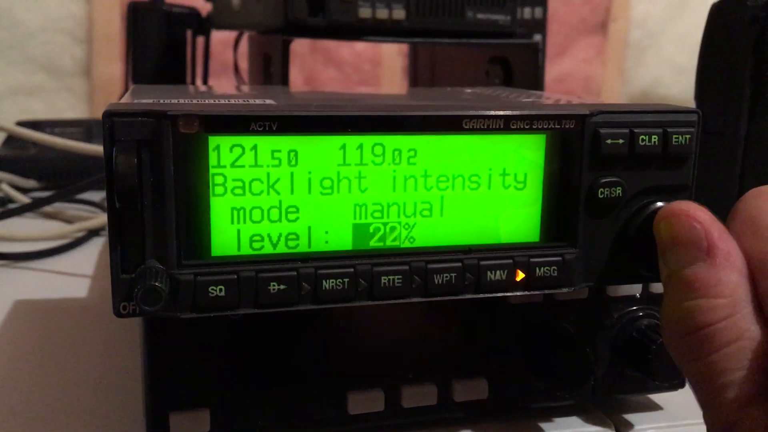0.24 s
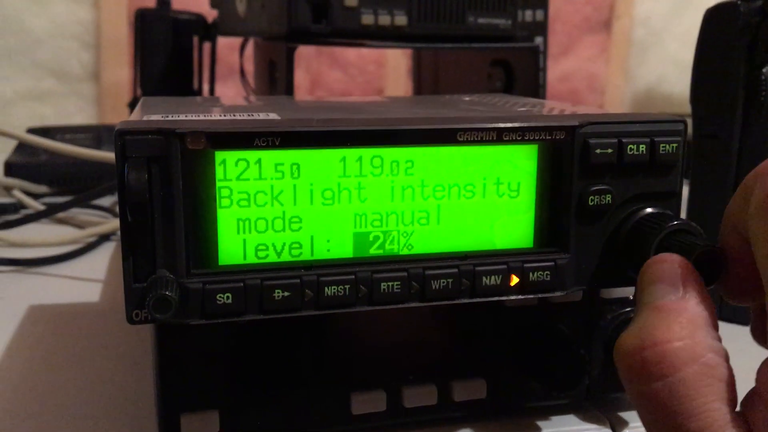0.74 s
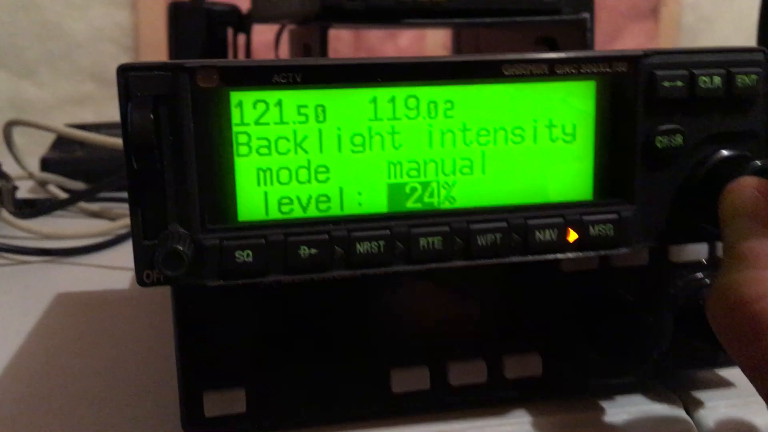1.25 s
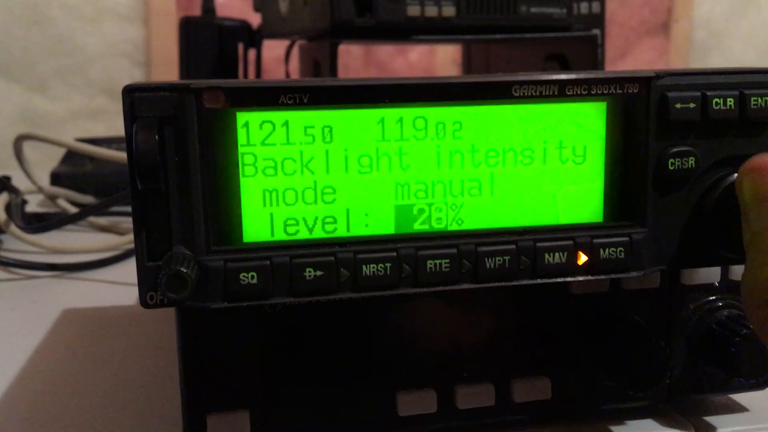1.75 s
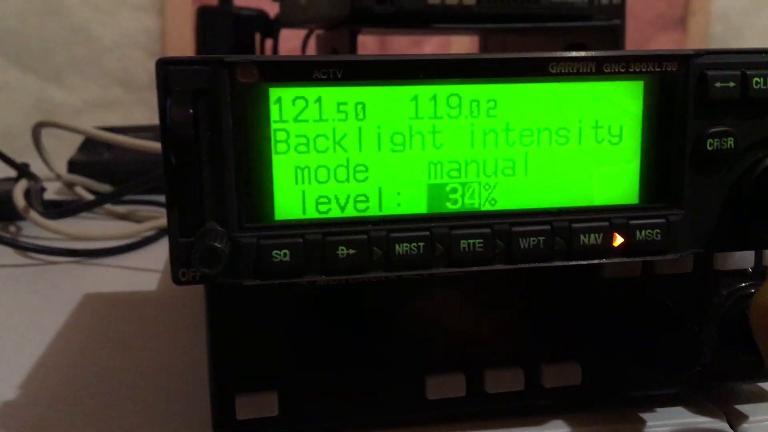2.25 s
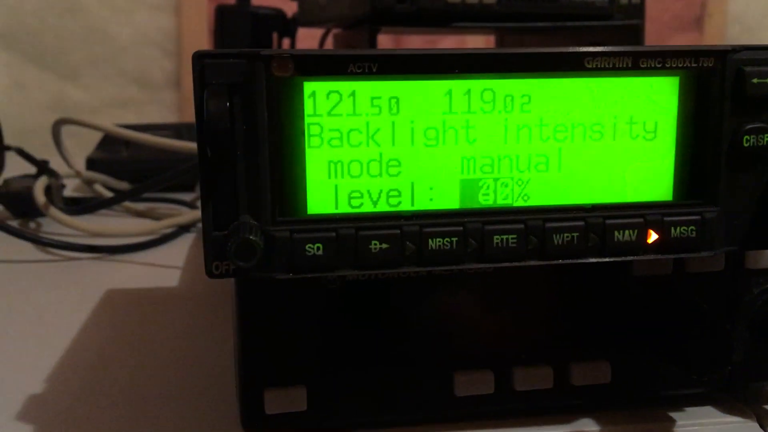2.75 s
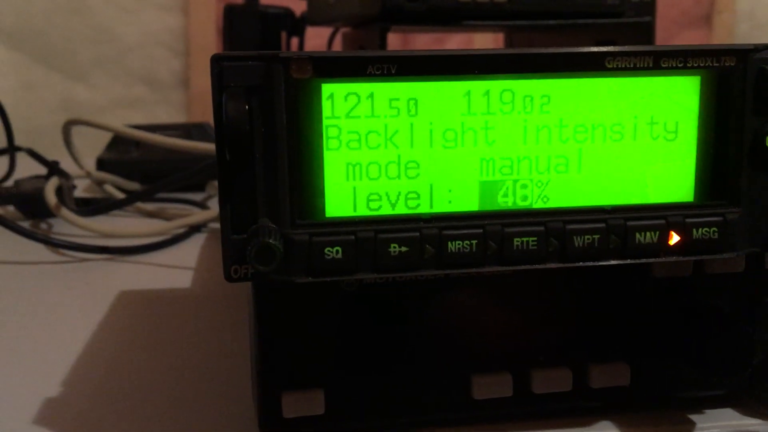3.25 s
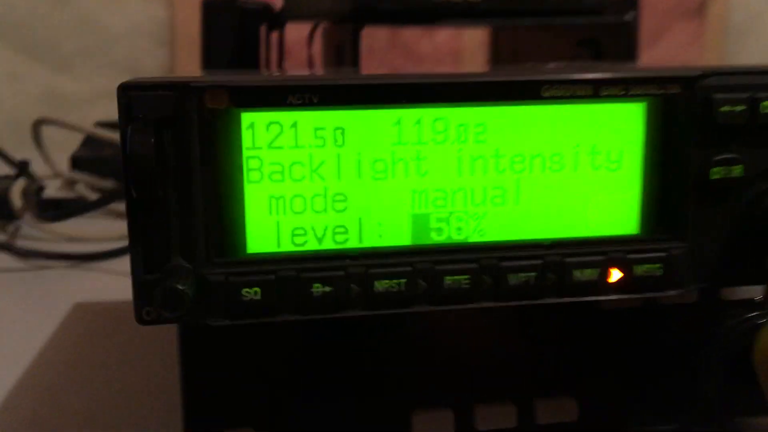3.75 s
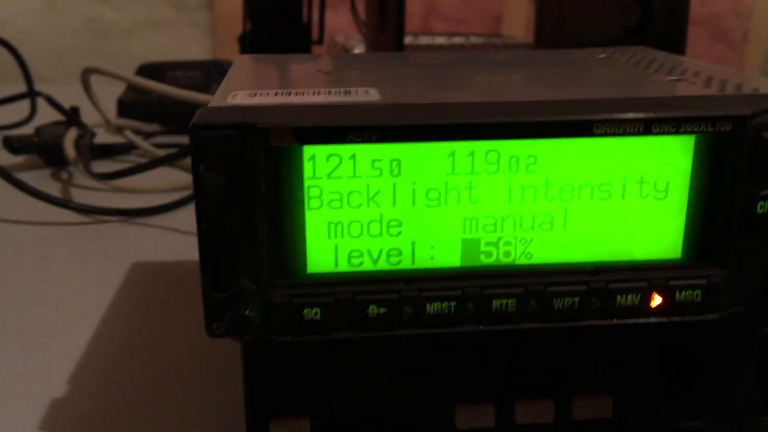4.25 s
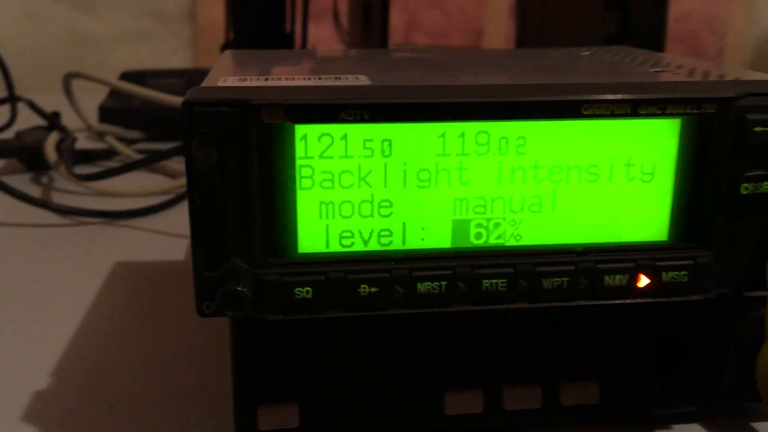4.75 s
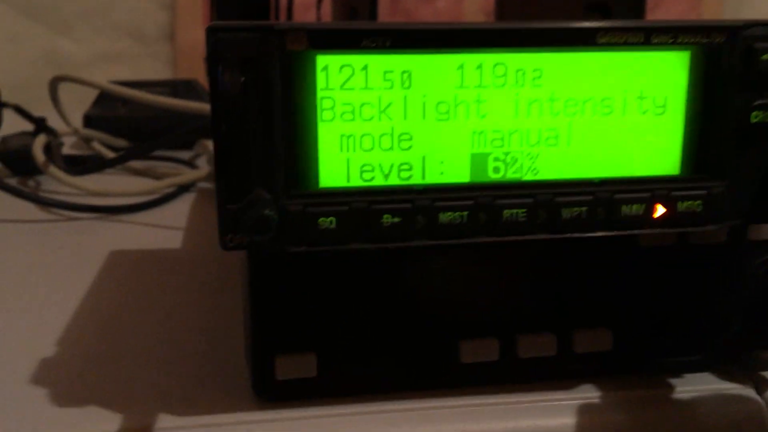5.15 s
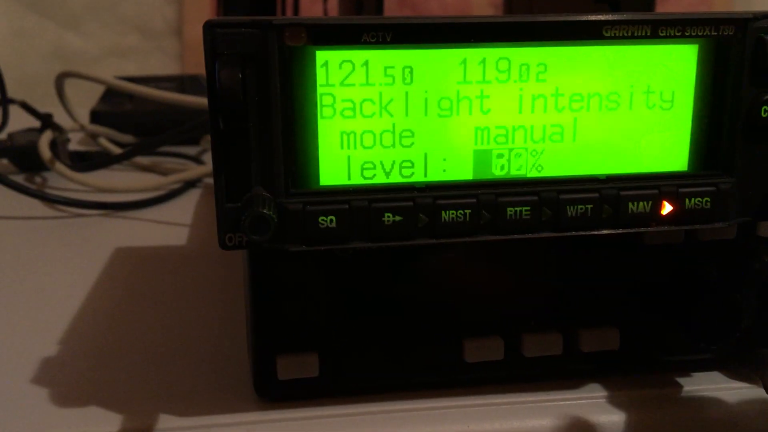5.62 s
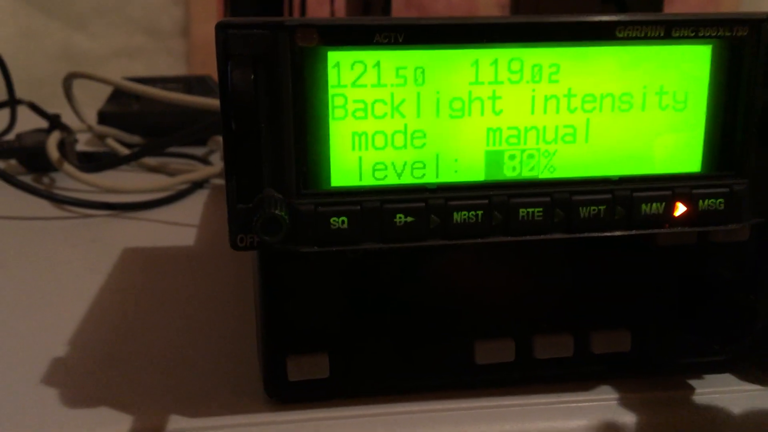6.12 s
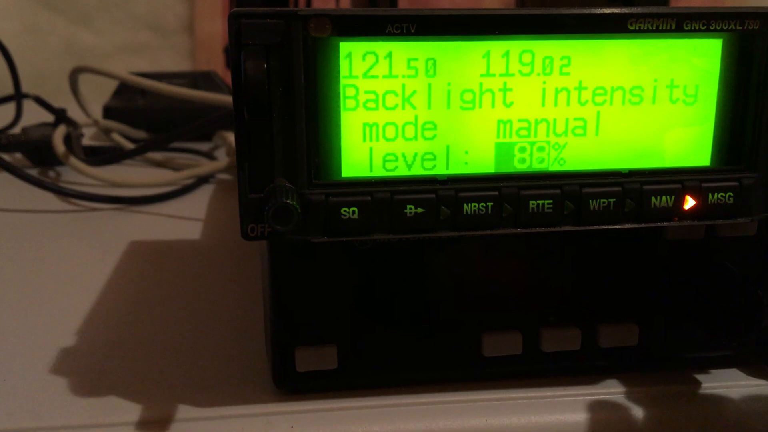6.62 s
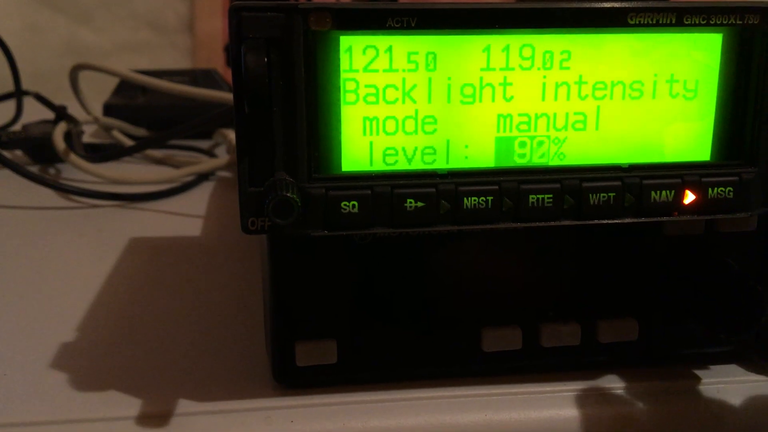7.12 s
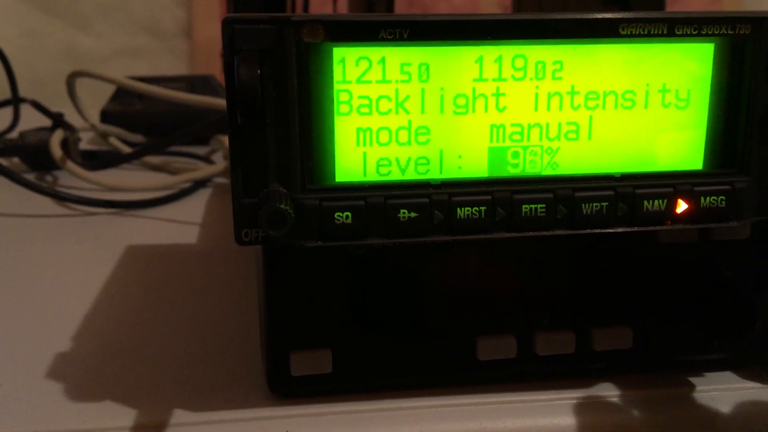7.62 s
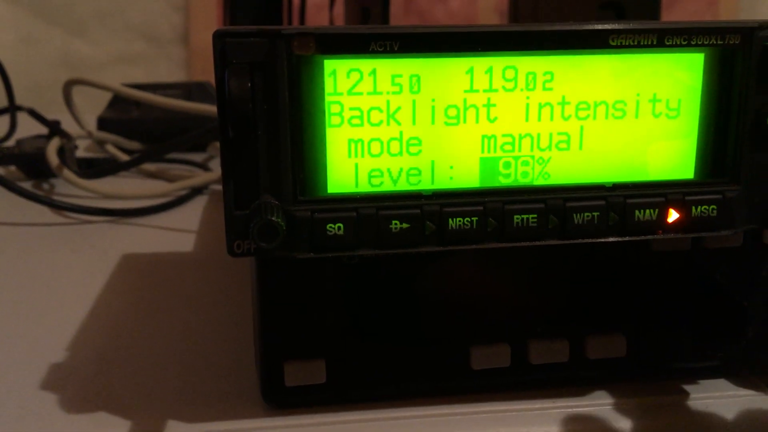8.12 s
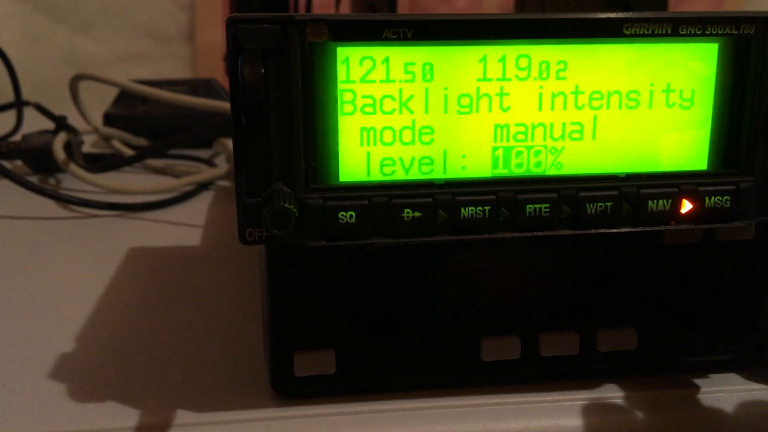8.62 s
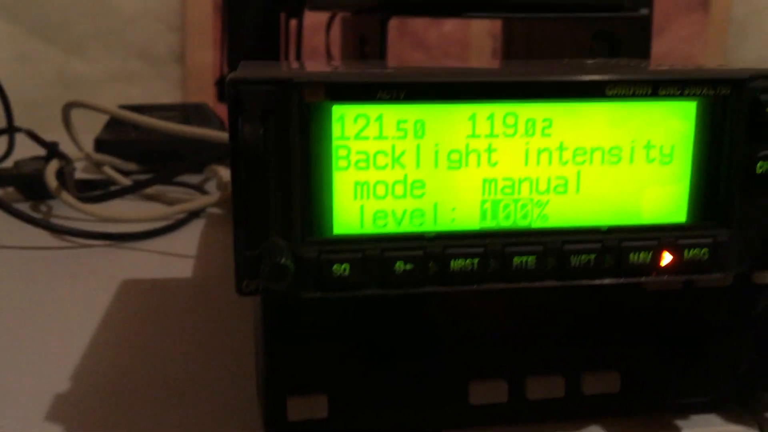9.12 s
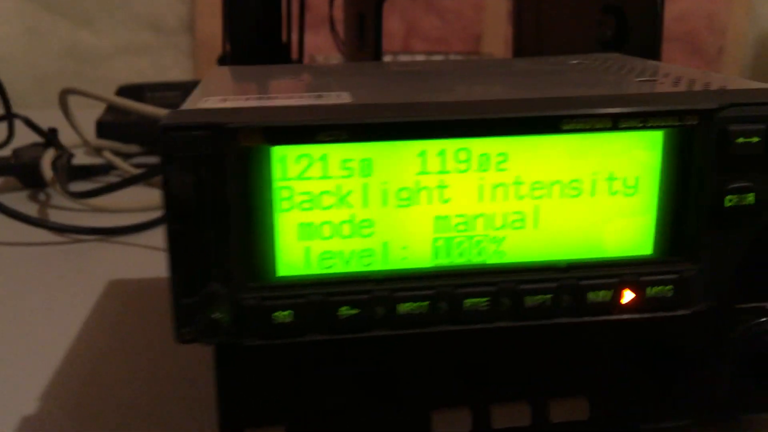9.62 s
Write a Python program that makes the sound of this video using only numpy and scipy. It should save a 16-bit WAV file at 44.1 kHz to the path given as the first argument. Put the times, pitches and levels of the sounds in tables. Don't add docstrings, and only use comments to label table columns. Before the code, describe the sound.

A stiff knob snaps through its notches close by, irregular bursts of bright plasticky clicks above steady cooling-fan drone in a small room.

```python
import sys
import numpy as np
from scipy import signal
from scipy.io import wavfile
from scipy.ndimage import uniform_filter1d

SR = 44100
rng = np.random.default_rng(int(sys.argv[2]) if len(sys.argv) > 2 else 0)


def wav_record(signal):
    frames = np.transpose(np.atleast_2d(signal))
    bounded = np.clip(frames, -1, 1)
    quanta = np.round(bounded * 32767).astype(np.int16)
    wavfile.write(sys.argv[1], SR, quanta)


def amplitude_ratio(level_db):
    exponent = np.asarray(level_db, float) / 20
    return 10 ** exponent


N = 435266

# (frequency [Hz], density [dB/Hz])
AIR = [(20, -27), (40, -13.5), (75, -10.5), (110, -8), (170, -18.5), (260, -8.5), (400, -20), (520, -16.5),
       (800, -16), (2000, -18.5), (2480, -22.5), (2750, -30), (3760, -29.5), (4900, -37.5)]
# (time [s], turn [0-1])
TURNED = [
    (0, 1),
    (.6, .95),
    (1.4, 0.32),
    (2.1, 0),
    (9.25, .05),
    (9.45, .6),
    (9.87, .9),
]
# (frequency [Hz], width [Hz], level [dB rms])
HUM = [(219, 7.1, -80), (320, 5, -87), (505.7, 1.7, -73), (667, 12, -74.5), (791, 3.6, -76), (893, 8, -94),
       (1045, 8.2, -77), (1110, 5.4, -76), (1502, 8, -74.5), (1910, 21, -76.5), (2095, 21, -77),
       (2406, 23, -76)]
# (blade rate [Hz], level [dB rms], octave level [dB rms])
BLADES = [(265.97, -74.7, -95), (268.9, -65.3, -79.7), (271.76, -67.7, -82), (275.02, -68.7, -84)]
SHAFT = [-74.5, -77, -83.5, -71.5, -81, -85]
# (frequency [Hz], level [dB rms])
MAINS = [(120.38, -66), (240, -76)]
# (frequency [Hz], density [dB/Hz])
HISS = [(2500, -16), (5000, -0.5), (6300, -1), (10100, -9.5), (10500, -10.5), (10750, -1), (11300, -7.5),
        (15100, -12), (15750, -15), (15850, -47.5)]
# (time [s], snap [dB], knob tick [dB], case ring [dB],
# panel knock [dB])
DETENTS = [(0.0171, -26, -36.5, -35.5, -39.5), (0.3651, -24.5, -30, -34.5, -39),
           (1.4391, -19.5, -25, -31, -41.5), (1.6002, -18.5, -25.5, -32, -36.5),
           (1.726, -17.5, -28.5, -33.5, -39.5), (1.8436, -19.5, -28, -32.5, -43),
           (1.952, -17.5, -27.5, -33.5, -39), (2.3974, -14.5, -26.5, -30, -34.5),
           (2.4497, -17.5, -26, -30, -37), (2.534, -19, -25.5, -34, -36),
           (2.6202, -20.5, -28.5, -31.5, -42), (2.7321, -22.5, -27.5, -30.5, -37),
           (2.824, -20, -29, -34, -38.5), (3.2023, -13, -22.5, -34, -41),
           (3.2565, -16.5, -26.5, -31.5, -40), (3.3433, -18.5, -24.5, -33.5, -38),
           (3.4045, -17.5, -29, -35.5, -41), (3.482, -18, -27, -30.5, -41),
           (4.261, -18, -25, -31, -36), (4.3807, -17, -31.5, -30.5, -38),
           (4.5155, -22.5, -31.5, -31.5, -33.5),
           (5.1625, -15.5, -25.5, -34.5, -36.5), (5.3033, -24.5, -29, -28, -37.5),
               (5.4188, -24.5, -31, -27.5, -34.5), (5.47, -23.5, -33.5, -32, -33.5),
               (5.5493, -21, -27.5, -32.5, -36), (5.8655, -15.5, -25, -30, -36),
               (5.9069, -18.5, -25.5, -29.5, -37), (5.9476, -19, -28, -31, -34),
               (5.9863, -21, -30.5, -28.5, -37), (6.0384, -18.5, -26.5, -30, -41),
               (6.356, -17, -24.5, -29.5, -33.5), (6.3958, -16, -26, -34, -38.5),
               (6.4587, -20.5, -26.5, -28.5, -38), (6.9062, -15, -24.5, -32, -37),
               (6.996, -20.5, -27, -29.5, -40), (7.4579, -18.5, -28.5, -31, -38.5),
               (7.5657, -17.5, -29.5, -32, -35), (7.9586, -21, -25, -29.5, -41),
               (8.4436, -19, -27, -31, -39)]
CLICKS = DETENTS
# (frequency [Hz], level [dB], t60 [s])
SNAP = [(3270, -10.5, .008), (3650, -10, 0.015), (4010, -6, 0.011), (4420, 2, 0.016), (4700, 2, 0.012),
        (5387, -1.5, 0.015), (5730, -5.5, 0.0084), (6035, -5.5, 0.016), (6780, -5.5, 0.011)]
# (frequency [Hz], level [dB], t60 [s])
KNOB = [(7330, -3, 0.0084), (8110, -3, 0.011), (8710, 2, 0.0044), (9530, -9, 0.014), (10670, -5, 0.012),
        (11780, 11, 0.0041), (12490, 0, 0.0065), (13300, -3, 0.011), (13100, -3, 0.0055),
        (15300, -9.5, 0.0073), (17200, -18.5, .006), (16500, -35, .005)]
# (frequency [Hz], level [dB], t60 [s])
CASE = [(1315, -1.5, 0.021), (1507, 6.5, 0.031), (1695, 12.5, 0.014), (1929, -0.5, 0.054), (2070, 0, 0.015),
        (2428, -7, 0.042), (2640, -14, 0.017)]
# (frequency [Hz], level [dB], t60 [s])
PANEL = [(650.5, -11, 0.093), (725, -15, 0.036), (775.3, -6.5, 0.069), (944.4, -13, 0.071),
         (1050.3, 2.5, 0.039), (1143, -7, 0.044), (1211, 0, 0.039)]
# (delay [s], level [dB])
ECHOES = [(.0021, -21.5), (.0043, -19.5), (.0068, -18), (0.0106, -24.5), (0.016, -29), (.022, -32.5)]
# (frequency [Hz], t60 [s])
ROOM = [(300, 0.28), (1000, 0.26), (2000, 0.25), (5000, 0.36), (9000, 0.37), (14000, 0.29)]
# (frequency [Hz], density
# [dB/Hz])
RADIATED = [(300, -26), (700, -4), (1600, 0.5), (2400, -4), (3000, -5), (4500, -4), (5400, -1),
            (7000, -7.5), (10000, -12.5), (12000, -11), (14500, -13), (15750, -16), (15900, -63)]
# (frequency [Hz], width [Hz], level [dB], click-to-click spread [dB])
LINGER = [(1974, 220, 5.5, 4.5), (2850, 160, -7.5, -1.5), (4440, 280, 2, 2.5), (5060, 140, -4, 2),
          (5400, 380, 2, 2.5), (6050, 340, 2, -2.5), (9260, 500, 5, 2), (12500, 700, 3, -0.5)]
# (frequency [Hz], level [dB], t60 [s])
BENCH = [(67.9, -11.5, 0.18), (125.9, -1.5, 0.18), (199, -6.5, 0.15), (328.4, -5.5, 0.085),
         (399, -12.5, 0.071)]
# (frequency [Hz], level [dB], t60 [s])
POLL = [(11060, 2.5, .004), (12200, 0.5, 0.0034), (13000, 5, 0.0036), (14130, 4.5, 0.0051),
        (14700, -1.5, .005)]
# (time [s], peak [dB])
TICKS = [
    (2.3351, -52),
    (3.0974, -48),
    (5.0634, -54),
    (6.8558, -47),
    (8.328, -60),
]

AIR_DB, HISS_DB = -52.5, -78
RUMBLE_TURN_DB, BODY_TURN_DB, HISS_TURN_DB = -6, 4.5, -0.5
SHAFT_HZ = 74.63
IN_STEP_S = 7.79
PUSH_DB, PUSH_PER_SNAP = -47.5, 0.3
POLL_PER_S, POLL_DB = 20, -71
CREAK_HZ, CREAK_DB, CREAK_S, CREAK_GROW_DB = 3063, -35, 0.014, 13.5
SWISH_TOP_S, SWISH_DB, SWISH_RISE_DB_PER_S, SWISH_FALL_DB_PER_S = 9.23, -73, 56, 56.5
EDGE_HZ = 16600


def evened(x):
    return x / np.sqrt(np.mean(x ** 2) + 1e-20)


def read(points, hz):
    f, value = np.transpose(points)
    return np.interp(np.log(hz + 1), np.log(f + 1), value)


def follow(rows):
    s, *columns = np.transpose(rows)
    return [np.interp(np.arange(N) / SR, s, c) for c in columns]


def add(mix, s, sound):
    part = mix[..., round(s * SR):][..., :sound.shape[-1]]
    part += sound[..., :part.shape[-1]]


def noise(spectrum, patchy_db):
    frames, hz = N // 256 + 5, np.fft.rfftfreq(1024, 1 / SR)
    a, b, patches = rng.standard_normal((frames, 513, 3)).T
    patches = uniform_filter1d(patches, size=10, axis=0)
    patches = evened(uniform_filter1d(patches, size=16, axis=1))
    z = (a + 1j * b) * amplitude_ratio(read(spectrum, hz)[:, None] + patchy_db * patches)
    return evened(signal.istft(z, nperseg=1024, noverlap=768)[1][:N])


def ring(modes, rattle_s, spread_db, detune, rise_s, lag_s=0):
    t = np.arange(round(SR * max(m[2] for m in modes)) + 300) / SR
    hz, db, t60 = np.transpose(modes)[:, :, None]
    level_luck, pitch_luck, phase, start_luck = rng.standard_normal((4, len(modes), 1))
    start_s = rattle_s * abs(start_luck) + lag_s * (hz.max() / hz - 1)
    since = np.maximum(t - start_s, 0)
    tones = np.sin(2 * np.pi * (hz * (1 + detune * pitch_luck) * since + phase))
    tones = tones * (1 - np.exp(-since / rise_s))
    body = (amplitude_ratio(db + spread_db * level_luck - 60 * since / t60) * tones).sum(0)
    rattle = rng.standard_normal(300) * (rng.random(300) < 0.2) * np.exp(-t[:300] / (2 * rattle_s))
    rattle[0] = 4.2
    direct = signal.fftconvolve(body, rattle)[:len(t)]
    return direct / abs(direct).max()


def air(low_hz, high_hz):
    x = noise(AIR + [(9000, -57.5), (15000, -99)], patchy_db=1.5)
    rumble = signal.sosfiltfilt(signal.butter(2, low_hz, fs=SR, output="sos"), x)
    below = signal.sosfiltfilt(signal.butter(2, high_hz, fs=SR, output="sos"), x)
    turned = follow(TURNED)[0]
    layers = rumble * amplitude_ratio(1.9 + RUMBLE_TURN_DB * turned)
    layers += (below - rumble) * amplitude_ratio(BODY_TURN_DB * turned - 0.76)
    layers += (x - below) * amplitude_ratio(1.7 + HISS_TURN_DB * turned)
    return amplitude_ratio(AIR_DB - 7.5) * layers


def fan(steady):
    t, out = np.arange(N) / SR, np.zeros(N)
    slow = np.arange(N // 200 + 2) * 200 / SR
    for hz, width_hz, db in HUM:
        r = np.exp(-np.pi * width_hz * 200 / SR)
        a, b = evened(signal.lfilter([1], [1, -2 * r, r * r], rng.standard_normal((2, len(slow)))))
        swing = np.interp(t, slow, a + steady) + 1j * np.interp(t, slow, b)
        out += amplitude_ratio(db) * evened((swing * np.exp(2j * np.pi * hz * t)).real)
    tones = MAINS + [((k + 1) * SHAFT_HZ, db) for k, db in enumerate(SHAFT)]
    tones += [(hz, db) for hz, db, _ in BLADES]
    tones += [(2 * hz, db) for hz, _, db in BLADES]
    for hz, db in tones:
        out += np.sqrt(2) * amplitude_ratio(db) * np.cos(2 * np.pi * hz * (t - IN_STEP_S))
    return out


def microphone_hiss():
    return amplitude_ratio(HISS_DB) * noise(HISS, patchy_db=1.4)


def knob_clicks():
    out = np.zeros(N)
    for s, snap_db, tick_db, case_db, panel_db in CLICKS:
        snap = ring(SNAP, 0.0003, 0.8, 0.013, 0.0001)
        tick = ring(KNOB, 0.000179, 1.7, 0.015, 0.0001)
        case = ring(CASE, 0.000487, 2.37, 0.024, 0.00031, lag_s=0.0009)
        panel = ring(PANEL, 0.0009, 1.0, 0.02, 0.0022, lag_s=0.004)
        add(out, s, amplitude_ratio(snap_db - 0.56) * snap)
        add(out, s, amplitude_ratio(tick_db + 9.5) * tick)
        add(out, s + 0.00043, amplitude_ratio(case_db + 5.5) * case)
        add(out, s + 0.00078, amplitude_ratio(panel_db + 4.0) * panel)
    return out


def echoes(x, dull_hz):
    near = np.zeros(SR // 20)
    for s, db in ECHOES:
        near[round(s * SR)] = amplitude_ratio(db)
    return signal.lfilter(*signal.butter(1, dull_hz, fs=SR), signal.oaconvolve(x, near)[:N])


def room(wet_db, build_s):
    out = np.zeros(N)
    ring_hz, width_hz, ring_db, spread_db = np.transpose(LINGER)[:, :, None]
    for s, snap_db, tick_db, case_db, _ in CLICKS:
        hz, t, z = signal.stft(rng.standard_normal(14000), SR, nperseg=256)
        low_db = 0.74 * (case_db - snap_db + 18.0)
        high_db = 0.87 * (tick_db - snap_db + 8.5)
        balance_db = np.interp(hz, [2500, 3550, 6560, 7920], [low_db, 0, 0, high_db])
        balance_db += 3.5 * uniform_filter1d(rng.standard_normal(len(hz)), size=3)
        struck_db = ring_db + spread_db * rng.standard_normal(ring_db.shape)
        balance_db += (struck_db * np.exp(-((hz - ring_hz) / width_hz) ** 2)).sum(0)
        decay_db = 60 * t / read(ROOM, hz)[:, None]
        z = z * amplitude_ratio((read(RADIATED, hz) + balance_db)[:, None] - decay_db)
        tail = signal.istft(z, SR, nperseg=256)[1]
        build = 1 - np.exp(-np.arange(len(tail)) / (SR * build_s))
        add(out, s, amplitude_ratio(snap_db - 4.5 + wet_db) * tail * build)
    return out


def bench():
    out = np.zeros(N)
    for s, snap_db, *_ in CLICKS:
        push_db = PUSH_DB + PUSH_PER_SNAP * (snap_db + 19.5)
        add(out, s, amplitude_ratio(push_db) * ring(BENCH, 0.0027, 1.7, 0.01, 0.025))
    return out


def camera_ticks():
    out = np.zeros(N)
    for s in np.arange(1, int(N / SR * POLL_PER_S)) / POLL_PER_S:
        late, size = rng.standard_normal(2)
        tick = ring(POLL, 0.0002, 1.5, 0.015, 0.0004)
        add(out, s + 0.0031 * late, amplitude_ratio(POLL_DB + 2.5 * size) * tick)
    return out


def creak():
    out, t = np.zeros(N), np.arange(-CREAK_S, 0, 1 / SR)
    clicks = CLICKS[1:]
    luck = rng.standard_normal((len(clicks), 2))
    for (s, snap_db, *_), (pitch, size) in zip(clicks, luck):
        whine = np.sin(2 * np.pi * CREAK_HZ * (1 + 0.03 * pitch) * t) * (1 + t / CREAK_S)
        level_db = snap_db + CREAK_DB + 2.5 * size + CREAK_GROW_DB * t / CREAK_S
        add(out, s - CREAK_S, amplitude_ratio(level_db) * whine)
    return out


def slack_ticks():
    out = np.zeros(N)
    for s, db in TICKS:
        add(out, s, amplitude_ratio(db - 4.5) * ring(SNAP[3:] + KNOB[:4], 0.0003, 2.5, 0.02, 0.0002))
    return out


def cloth_swish():
    after = np.arange(N) / SR - SWISH_TOP_S
    swish_db = SWISH_DB + np.minimum(SWISH_RISE_DB_PER_S * after, -SWISH_FALL_DB_PER_S * after)
    grain = amplitude_ratio(2.5 * evened(uniform_filter1d(rng.standard_normal(N), size=130)))
    cloth = [(1500, -27), (3000, -3), (8000, -2.5), (14000, -2.5), (15750, -4.5), (15850, -46)]  # (Hz, dB/Hz)
    return amplitude_ratio(swish_db) * grain * noise(cloth, patchy_db=0.89)


def scene():
    background = air(low_hz=183, high_hz=1300) + fan(steady=0.44) + microphone_hiss() + camera_ticks()
    clicks = knob_clicks() + slack_ticks()
    space = echoes(clicks, dull_hz=3470) + room(wet_db=-17.0, build_s=0.0013)
    return (background + clicks + space + bench() + creak() + cloth_swish())[None]


def low_pass(x):
    return signal.sosfilt(signal.butter(12, 16970, fs=SR, output="sos"), x)


def record(dry):
    edge = signal.firwin(255, EDGE_HZ, window=("kaiser", 9), fs=SR)
    thin = signal.sosfilt(signal.butter(2, 35, "high", fs=SR, output="sos"), dry)
    mix = signal.oaconvolve(thin, edge[None], "same")
    return low_pass(mix)


dry = scene()
out = record(dry)
wav_record(out)
```